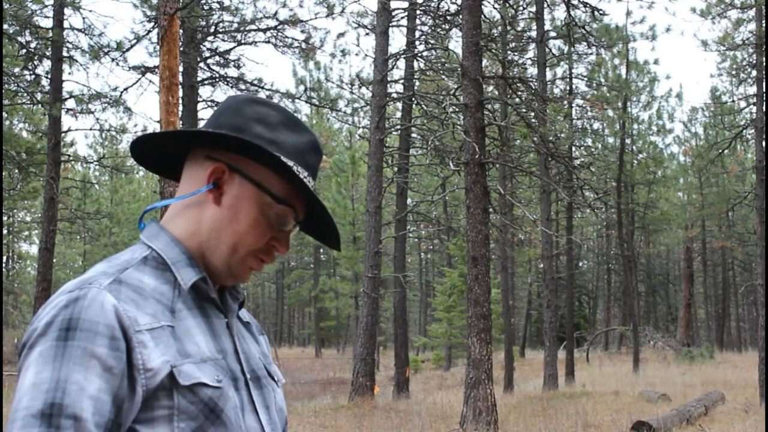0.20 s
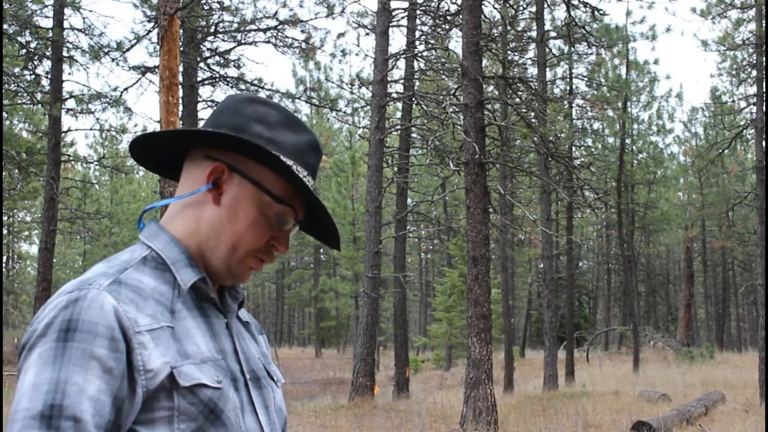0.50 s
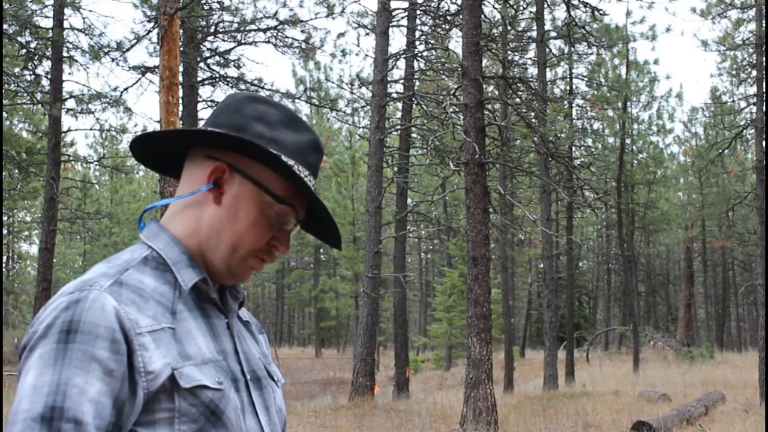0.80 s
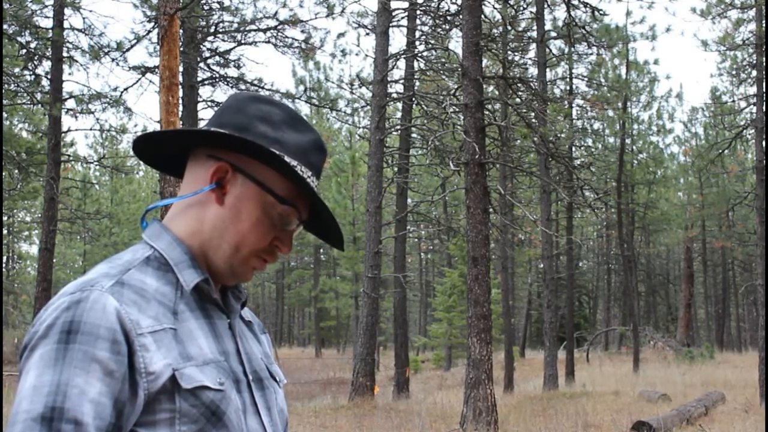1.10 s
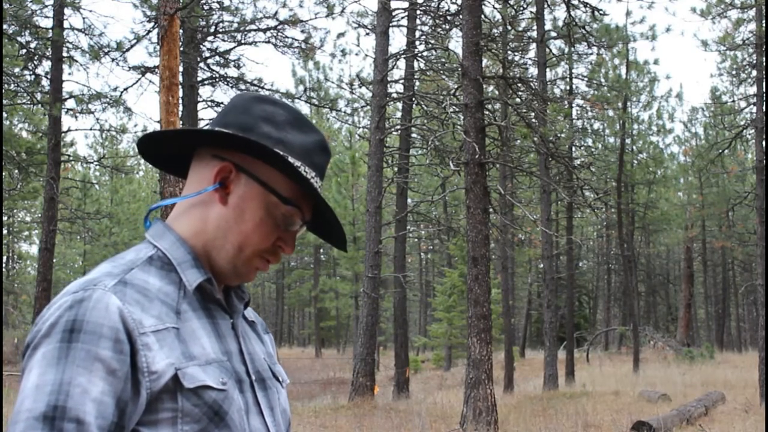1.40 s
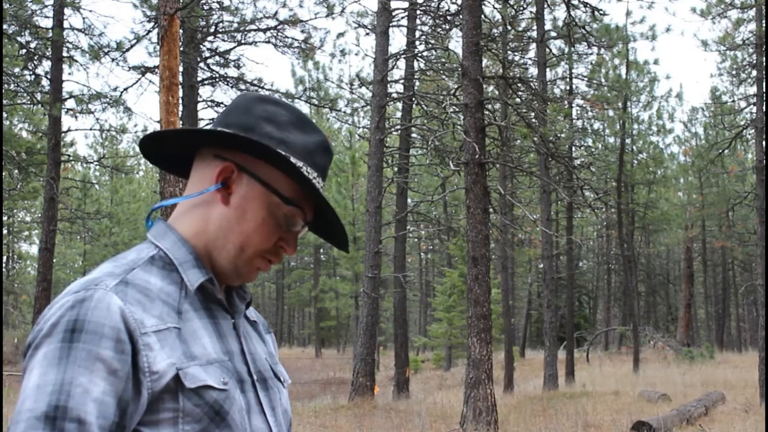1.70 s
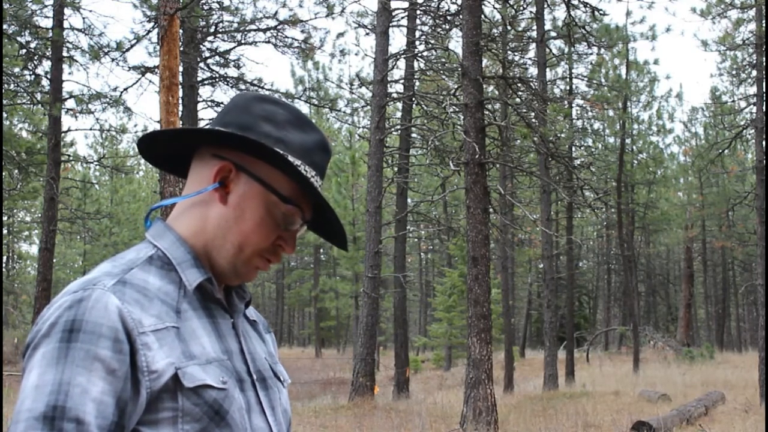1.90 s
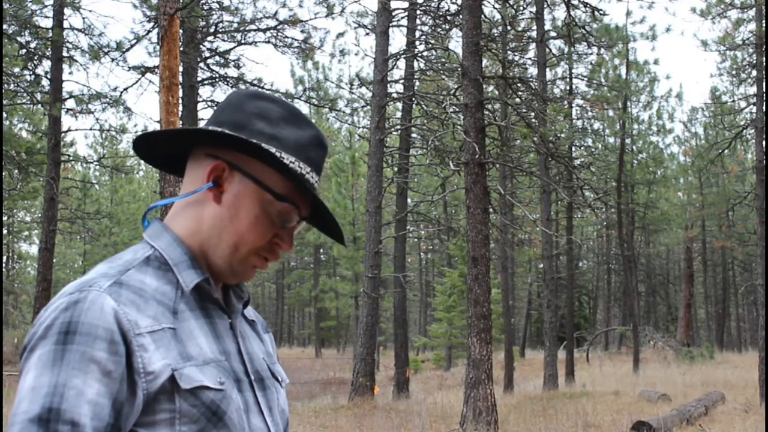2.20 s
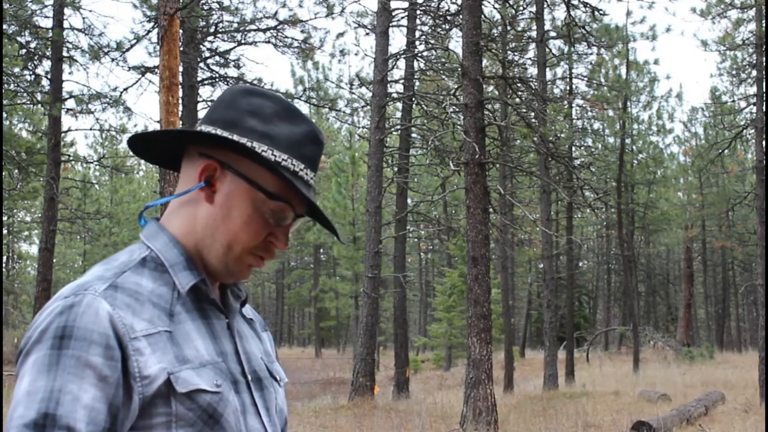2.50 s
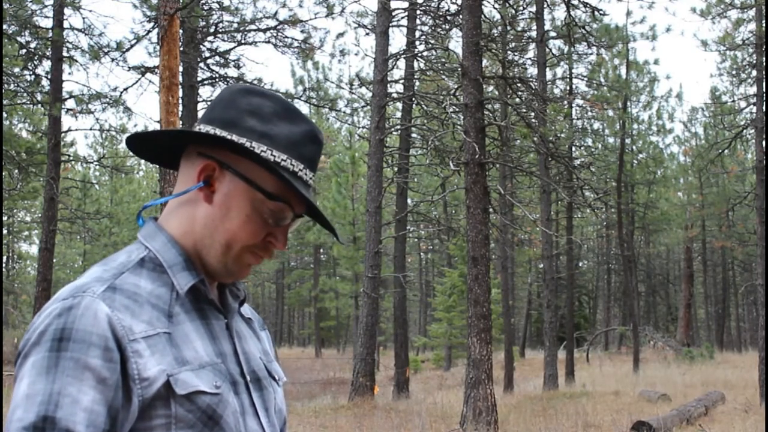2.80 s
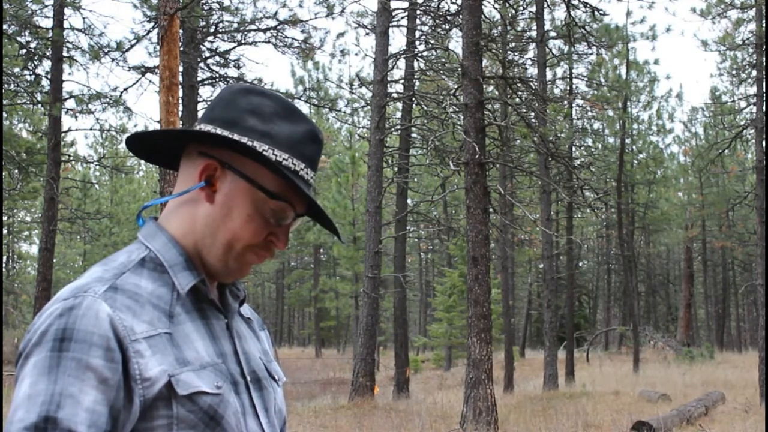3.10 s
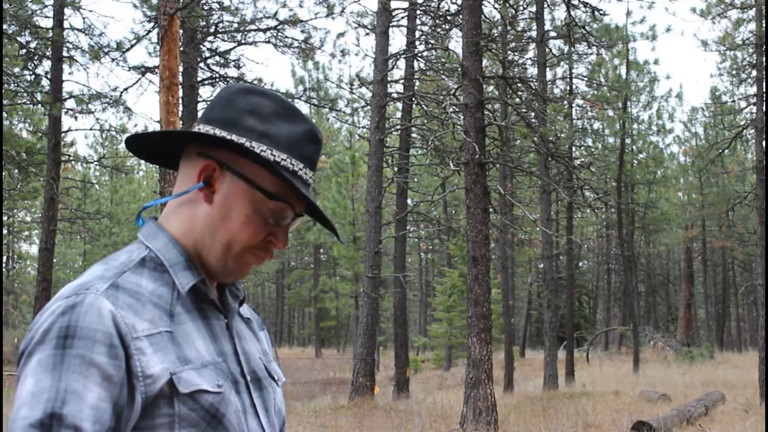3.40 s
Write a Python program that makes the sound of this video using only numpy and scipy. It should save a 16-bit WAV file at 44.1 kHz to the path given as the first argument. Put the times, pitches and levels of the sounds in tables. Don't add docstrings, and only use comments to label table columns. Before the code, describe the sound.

Close, hard metallic clicks of a revolver being cocked outdoors over a low distant engine rumble

```python
import sys
import numpy as np
from scipy import signal
from scipy.io import wavfile

SR = 44100
rng = np.random.default_rng(int(sys.argv[2]) if len(sys.argv) > 2 else 0)


def boost(x):
    u = np.asarray(x, float) / 20
    return 10 ** u


def output_pcm(signal):
    pcm = np.clip(np.atleast_2d(signal).T, -1, 1) * 32767
    wavfile.write(sys.argv[1], SR, np.round(pcm).astype(np.int16))


N = 154350


def rms_one(x):
    return x / np.sqrt(np.mean(x ** 2) + 1e-20)


def drift(rate_hz):
    r = np.exp(-80 * np.pi * rate_hz / SR)
    noise = rng.standard_normal(N // 40 + 2002)
    slow = signal.lfilter([1], [1, -2 * r, r * r], noise)[2000:]
    return np.interp(np.arange(N) / 40, np.arange(len(slow)), rms_one(slow))


def ring(clicks, hz, t60_s):
    r = boost(-60 / (t60_s * SR))
    w = 2 * np.pi * hz / SR
    return signal.lfilter([0, np.sin(w)], [1, -2 * r * np.cos(w), r * r], clicks + 1e-18)


def band(x, low_hz, high_hz):
    edges = np.clip([low_hz, high_hz], 20, SR / 2.2)
    return signal.sosfilt(signal.butter(2, edges, "band", fs=SR, output="sos"), x)


def high_pass(x, hz):
    return signal.sosfilt(signal.butter(2, hz, "high", fs=SR, output="sos"), x)


def add(out, start_s, piece):
    i = int(start_s * SR)
    out[i:i + len(piece)] += piece[:N - i]


# start_s, pitch_hz
FIRING = [(0.0, 94.91), (0.63, 93.42), (0.709, 95.92), (1.61, 98.85), (2.63, 97.55), (2.9, 99.84),
          (3.24, 94.6), (3.5, 98.6)]
# multiple, level_db
ORDERS_DB = [(1, -19), (2, -18), (3, -41.5), (4, 7), (5, 2), (6, 1.5), (7, -26.5), (8, 7), (9, -28.5),
             (10, -18.5), (11, -11.5), (12, -27)]
ENGINE_DB, ENGINE_WOBBLE_DB = -36, 1.5
PULSE_LAG_CYCLES = 0.75


def engine_cycle():
    s, hz = np.transpose(FIRING)
    turns = np.cumsum(np.interp(np.arange(N) / SR, s, hz / 8)) / SR
    return 2 * np.pi * (turns - PULSE_LAG_CYCLES)


def engine_orders(cycle):
    out = np.zeros(N)
    for multiple, db in ORDERS_DB:
        level = boost(ENGINE_DB + db + ENGINE_WOBBLE_DB * drift(2.4))
        out -= level * np.cos(multiple * cycle + 0.3 * drift(0.93))
    return out


# pitch_hz, level_db (rms), width_hz
WHINES = [(268.8, -43, 1.3), (335.4, -44.5, 2.7), (401.4, -47.5, 7.1)]


def accessory_whines():
    out, t = np.zeros(N), np.arange(N) / SR
    for hz, db, width_hz in WHINES:
        tone = np.sin(2 * np.pi * hz * t + 1.2 * drift(width_hz))
        out += boost(db) * rms_one(tone * boost(2.5 * drift(1.2)))
    return out


# pitch_hz, level_db (per Hz)
WASH = [(88, -31), (150, -1), (178, -18.5), (258, -3.5), (496, -2.5), (888, 0.5), (1290, -13), (1530, -8.5),
        (4500, -30), (5850, -63.5), (9900, -120)]
WASH_DB, WASH_THROB_DB, LOW_WASH_DB = -33, 0.7, -36
PUFF_DB, PUFF_SHARP = -56, 3.3


def engine_wash(cycle):
    white, wash, shared = rng.standard_normal((2, N)), np.zeros(N), drift(6)
    wash_hz, wash_db = np.transpose(WASH)
    edges = 150 * 2 ** np.arange(0, 5.6, 0.5)
    for k, (low, high) in enumerate(zip(edges, edges[1:])):
        db = np.interp(np.log(low * high) / 2, np.log(wash_hz), wash_db)
        wash += boost(db + 0.31 * shared + drift(35)) * band(white[k % 2], low, high)
    throb_db = WASH_THROB_DB * (np.cos(cycle) + np.cos(2 * cycle))
    wash = rms_one(wash) * boost(WASH_DB + throb_db)
    pulse = np.exp(PUFF_SHARP * (np.cos(cycle) - 1))
    puff = boost(PUFF_DB) * pulse * rms_one(band(white[1, ::-1], 2500, 6000))
    return wash + puff + boost(LOW_WASH_DB) * rms_one(band(white[0], 45, 130))


def engine():
    cycle = engine_cycle()
    return engine_orders(cycle) + accessory_whines() + engine_wash(cycle)


def air_hiss():
    return boost(-52 + 2.0 * drift(5.7)) * rms_one(band(rng.standard_normal(N), 2500, 12500))


# start_s, level_db, pitch_hz (centre), t60_s
TICKS = [(.630, -30, 8630, 0.0032), (0.6464, -32.5, 7000, 0.0031), (0.809, -11.5, 7030, 0.0096),
         (0.9911, -30, 8810, 0.0038), (0.996, -11, 2766, 0.014), (0.9968, -15.5, 3600, 0.0078),
         (.9968, -15, 5540, 0.0069), (0.9967, -10.5, 10900, 0.0074), (0.9966, -21.5, 1500, .006),
         (.9966, -13.5, 7890, 0.0067), (1.504, -23.5, 8660, 0.0026), (1.505, -23.5, 3910, 0.0041),
         (1.730, -33, 7680, 0.0037), (1.802, -27, 8440, 0.002), (1.9010, -23.5, 8200, 0.0067),
         (2.1400, -4, 2550, 0.014), (2.1402, -11, 3300, .006), (2.1400, -14.5, 6650, 0.0083),
         (2.1402, -7, 11040, 0.004), (2.156, -15.5, 9450, 0.0039), (2.177, -32.5, 10080, 0.0034),
         (2.277, -33.5, 10110, 0.0032), (2.357, -38, 6500, 0.007), (2.8222, -25, 5550, 0.0042),
         (2.833, -29.5, 7450, 0.0069), (2.851, -30.5, 6940, 0.004), (2.878, -32, 6900, .005),
         (2.9135, -28, 9100, 0.0021), (2.9137, -38.5, 5000, .003), (3.133, -34.5, 7000, .003),
         (3.287, -19, 2430, 0.0036), (3.312, -21, 7000, .004), (3.332, -15, 7100, .004),
         (3.3505, -17, 4640, 0.0045), (3.3505, -19.5, 9930, 0.0031), (3.3625, -13.5, 9960, 0.0058)]
TICK_SPAN, TICK_RING = 1.3, 0.07


def ticks():
    out, t = np.zeros(N), np.arange(1200) / SR
    for s, db, hz, t60_s in TICKS:
        burst = rng.standard_normal(len(t)) * boost(-60 * t / t60_s)
        tick = band(burst, hz / TICK_SPAN, hz * TICK_SPAN)
        tick += TICK_RING * ring(burst, hz, t60_s * 1.7)
        add(out, s, boost(db) * tick / np.abs(tick).max())
    return out


CHATTER_PER_S, CHATTER_FADE_S = 13000, 0.0005
MODE_SPREAD_DB, CRACK_DB = 1.0, 6.5


def snaps(rows, body, split_hz, blow, sag_db_per_s, crack_hz):
    out, t = np.zeros(N), np.arange(SR // 20) / SR
    for s, db, length_s, low_db, mid_db in rows:
        hits = rng.standard_normal(len(t)) * (rng.random(len(t)) < CHATTER_PER_S / SR)
        hits[0] = blow
        hits *= boost(-sag_db_per_s * t) * np.exp(-np.maximum(t - length_s, 0) / CHATTER_FADE_S)
        quick = np.zeros(len(t))
        for k, (hz, mode_db, t60_s) in enumerate(body):
            tilt_db = (low_db, mid_db, 0)[np.searchsorted(split_hz, hz)]
            level = boost(mode_db + tilt_db + MODE_SPREAD_DB * rng.standard_normal())
            quick += level * (-1) ** k * ring(hits, hz, t60_s)
        quick += boost(CRACK_DB) * band(hits, crack_hz, 12000) * 4
        rms = np.sqrt(np.sum(quick ** 2) / (2 * SR * (length_s + 2 * CHATTER_FADE_S)))
        add(out, s, boost(db) * quick / rms / 3)
    return out


# start_s, level_db, chatter_s, low_modes_db, middle_modes_db
STRIKES = [(.8092, -11.5, .0008, 6, 0), (.8104, 14, 0.0016, -1, 4), (.8126, 9, .0022, 4, 2.5),
           (.8158, -4, 0.0015, -2, -0.5), (1.0580, -1, 0.00067, -3, -2.5), (1.0591, 19.5, 0.0018, -6, 8.5),
           (1.0611, 11, .0010, 4, 6.5), (1.0628, 11.5, 0.001, 3, 4), (1.1460, 23, 0.00026, -2.5, -1),
           (1.1472, 20.5, 0.00037, 7, 2), (1.1485, 13.5, 0.0011, 0.5, -2.5),
           (1.1502, 11.5, 0.00094, 5.5, 1.5), (1.3208, 23, 0.0013, -5, 2), (1.3226, 23, 0.00049, -7, 3),
           (1.3252, 15, .0004, 8, 5), (1.5938, 27, 0.00079, 1, 0), (1.5957, 24, 0.00092, 2.5, -1),
           (1.5984, 17, 0.00082, 2, 4)]
# pitch_hz, level_db, t60_s
ACTION = [(870, -21.5, .005), (2150, -21.5, 0.011), (2678, -9.5, 0.021), (3160, -18.5, 0.015),
          (3780, -16.5, 0.0049), (4300, -13.5, 0.0059), (5630, -15.5, 0.0044), (6906, -5.5, 0.0074),
          (8730, -5.5, 0.0064), (9777, 8, 0.007), (10673, 5.5, 0.0034), (11996, -2.5, 0.012),
          (14000, -24, 0.013)]


def hammer_snaps():
    hits = snaps(STRIKES, ACTION, split_hz=(3400, 5800), blow=3.37, sag_db_per_s=998, crack_hz=3600)
    return high_pass(hits, 490)


# start_s, level_db, barrel_share (0 all cylinder, 1 all barrel)
NOTCHES = [
    (0.8098, 13.5, 1),
    (1.0581, 20.5, 0.05),
    (1.1464, 24.5, 0),
    (1.3223, 22.5, 0.3),
    (1.5938, 20.5, 0.6),
]
# pitch_hz, level_db, t60_s
BARREL = [(2692, -14, .3), (4490, -7, .15), (4748, 0, .3), (4966, -6, .15), (5822, -7, .22), (6005, -2, .2)]
# pitch_hz, level_db, t60_s
CYLINDER = [(3780, -6, .09), (3900, -11, .05), (6090, -9, .06), (6218, -4, .085)]
RING_DB = -41


def rings():
    s, db, share = np.transpose(NOTCHES)
    out = np.zeros(N)
    for modes, part in ((BARREL, share), (CYLINDER, 1 - share)):
        blows = np.zeros(N)
        blows[(s * SR).astype(int)] = boost(db + RING_DB) * part
        for hz, mode_db, t60_s in modes:
            out += boost(mode_db) * ring(blows, hz, t60_s)
    return out


# start_s, length_s, level_db, pitch_hz (centre), width_hz
RUBS = [
    (2.145, 0.133, -36, 2580, 496),
    (.97, .028, -42.5, 8990, 8000),
    (2.141, 0.072, -38, 8100, 7480),
    (2.213, 0.11, -40.5, 7450, 7200),
    (2.802, 0.065, -47, 6140, 4020),
    (2.867, 0.034, -44.5, 6800, 2980),
    (3.206, .018, -15, 5810, 8940),
    (3.215, 0.035, -21, 5950, 10040),
    (3.293, 0.19, -41.5, 6920, 7550),
]
RUB_GRAINS_PER_S, RUB_EDGE_S = 11000, 0.01


def rubs():
    out, t = np.zeros(N), np.arange(N) / SR
    chance = RUB_GRAINS_PER_S * boost(3 * drift(60)) / SR
    grains = rng.standard_normal(N) * (rng.random(N) < chance)
    for s, length_s, db, hz, width_hz in RUBS:
        stroke = np.clip(np.minimum(t - s, s + length_s - t) / RUB_EDGE_S, 0, 1)
        out += boost(db) * stroke * rms_one(band(grains, hz - width_hz / 2, hz + width_hz / 2))
    return out


# start_s, level_db, chatter_s, low_modes_db, middle_modes_db
GATE = [
    (3.1860, -18, 0.0018, -0.5, -1.5),
    (3.1883, 6.5, 0.0013, -6.5, -14),
    (3.1908, -6.5, 0.004, 17.5, 0),
    (3.1950, -2, .003, 27.5, -3.5),
    (3.1982, 1, .002, 15, 3),
    (3.2006, 11, 0.0026, 2.5, -4),
    (3.2044, 8, .0013, 10, 6.5),
    (3.2075, -2.5, .003, 6, 1),
    (3.2118, 0.5, 0.0025, -1.5, -5),
    (3.2175, -5.5, .003, -3, 4.5),
]
# pitch_hz, level_db, t60_s
GATE_BODY = [(1230, -13, 0.0078), (2150, -15.5, 0.0072), (2810, 6, 0.0098), (3400, 0, 0.0089),
             (4170, 6.5, 0.0025), (6180, 7, 0.004), (7160, 3, 0.0051), (9100, 4.5, 0.0049),
             (10880, -4, 0.006), (12500, -8.5, 0.0095)]


def gate_slap():
    return snaps(GATE, GATE_BODY, split_hz=(2500, 3800), blow=1.0, sag_db_per_s=0, crack_hz=1200)


TRUNK_ECHO_DB, TRUNK_T60_S = -31, 0.035


def trunks(x):
    t = np.arange(SR // 4) / SR
    onset = np.clip(t / 0.0031, 0, 1)
    tail = rng.standard_normal(len(t)) * boost(-60 * t / TRUNK_T60_S) * onset
    tail /= np.sqrt(np.sum(tail ** 2))
    return boost(TRUNK_ECHO_DB) * signal.fftconvolve(x, band(tail, 2500, 13000))[:N]


def scene():
    gun = high_pass(ticks() + hammer_snaps() + rings() + rubs() + gate_slap(), 1000)
    mid = engine() + air_hiss() + gun + trunks(gun)
    side = boost(-34) * signal.lfilter([1, -0.3], [1], np.roll(mid, 37))
    return np.array([mid + side, mid - side])


# start_s, level_db
DUCKS = [
    (0.8118, -19.5),
    (1.0575, -23.5),
    (1.1443, -28.5),
    (1.3197, -29.5),
    (1.5921, -30),
    (3.1891, -6.5),
    (3.202, -28),
]
START_GAIN_DB, RELEASE_DB_PER_S, ATTACK_S = -8.5, 36, 0.017


def gain_control():
    t = np.arange(N) / SR
    db = np.minimum(0, START_GAIN_DB + RELEASE_DB_PER_S * t)
    for s, pulled_db in DUCKS:
        climb_db = pulled_db + RELEASE_DB_PER_S * (t - s)
        db = np.where(t > s, np.minimum(db, climb_db), db)
    r = np.exp(-1 / (ATTACK_S * SR))
    return boost(signal.lfilter([1 - r], [1, -r], db - db[0]) + db[0])


def band_limit(x):
    return signal.sosfilt(signal.butter(12, 15890, fs=SR, output="sos"), x)


CLIP, PREAMP_HISS_DB, CUTOFF_HZ = 0.94, -72, 15900


def record(dry):
    x = np.clip(dry * gain_control(), -CLIP, CLIP)
    x = x + boost(PREAMP_HISS_DB) * signal.lfilter([1], [1, -0.3], rng.standard_normal(N))
    x = signal.sosfilt(signal.cheby2(10, 60, CUTOFF_HZ + 2500, fs=SR, output="sos"), x)
    return band_limit(np.clip(x, -1, 1))


dry = scene()
out = record(dry)
output_pcm(out)
```